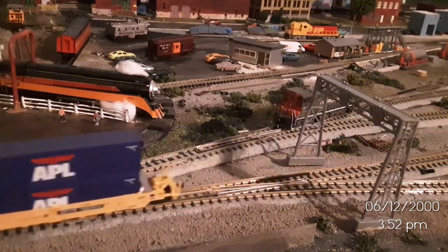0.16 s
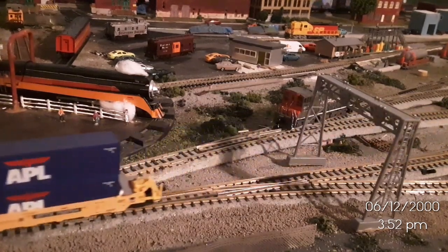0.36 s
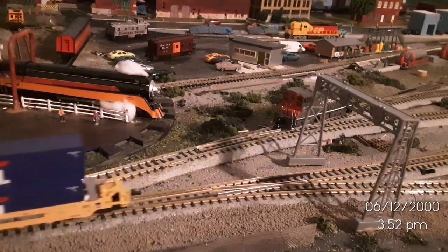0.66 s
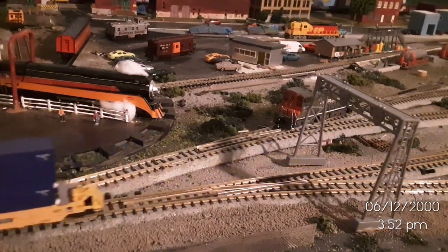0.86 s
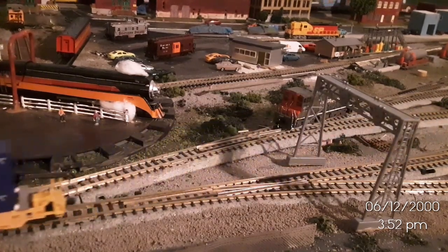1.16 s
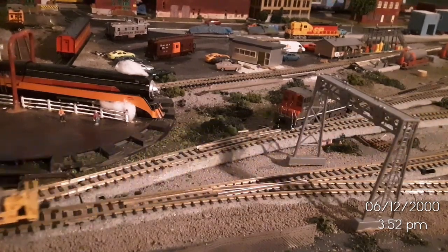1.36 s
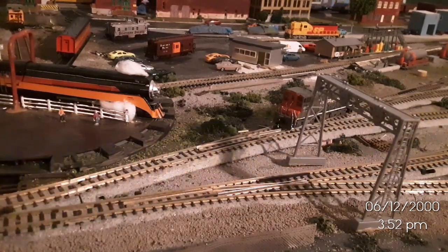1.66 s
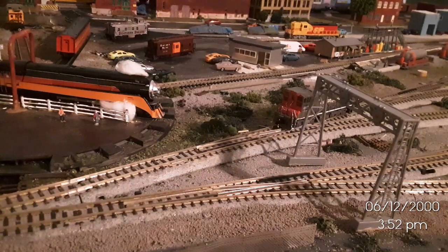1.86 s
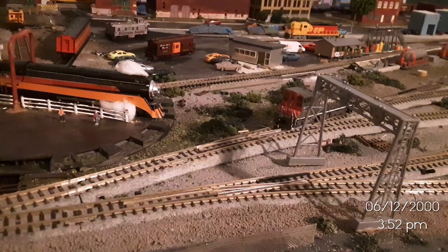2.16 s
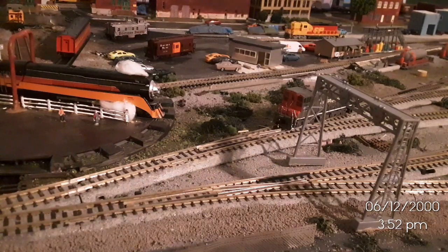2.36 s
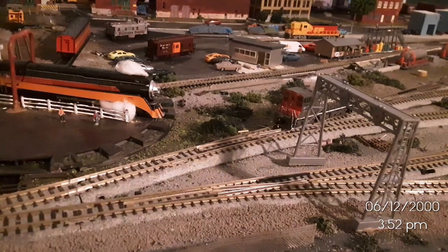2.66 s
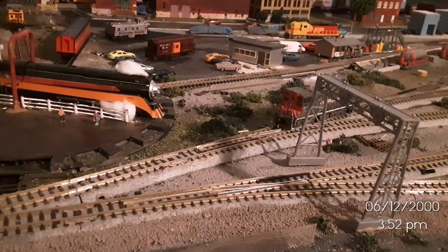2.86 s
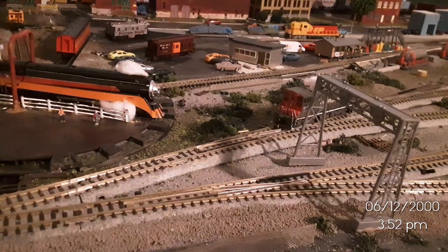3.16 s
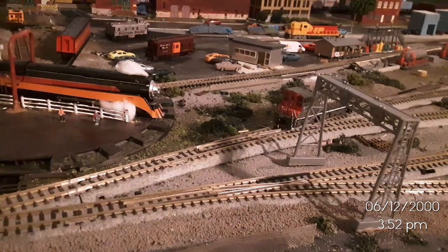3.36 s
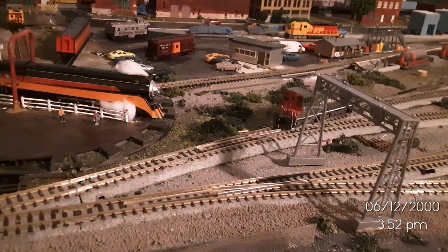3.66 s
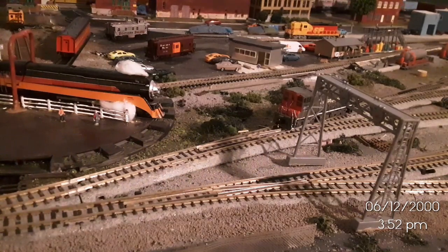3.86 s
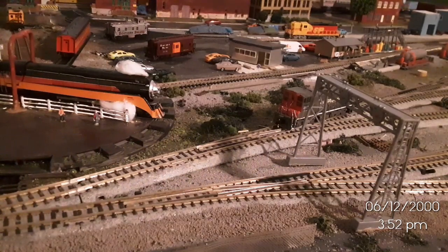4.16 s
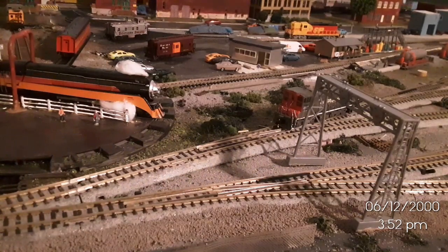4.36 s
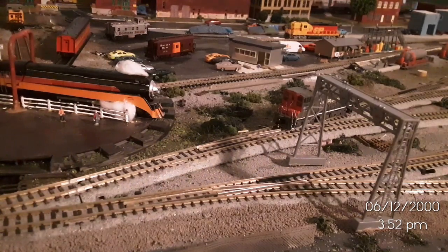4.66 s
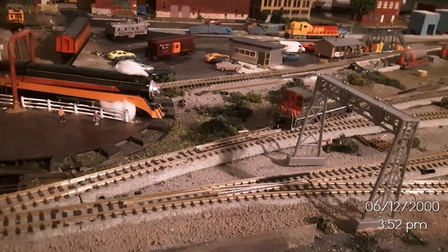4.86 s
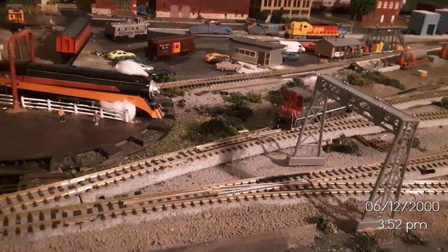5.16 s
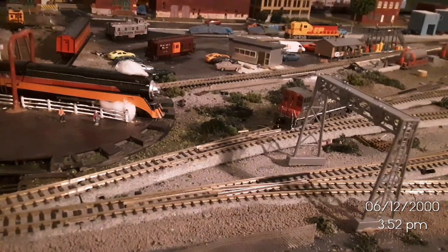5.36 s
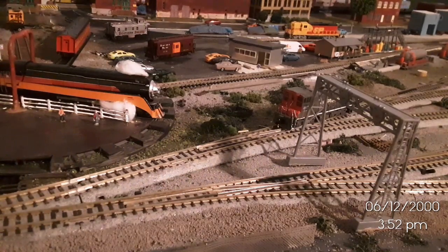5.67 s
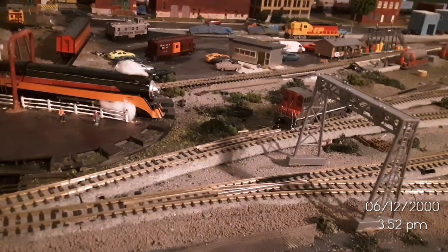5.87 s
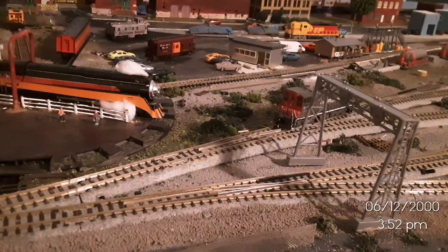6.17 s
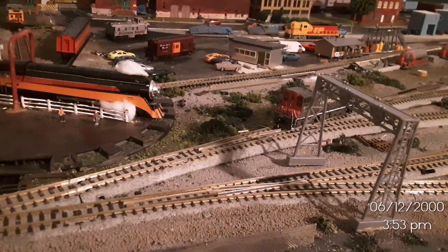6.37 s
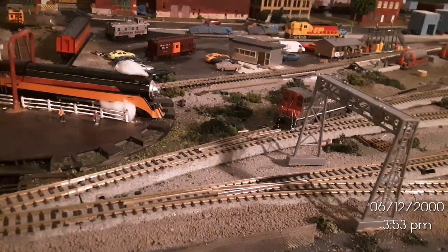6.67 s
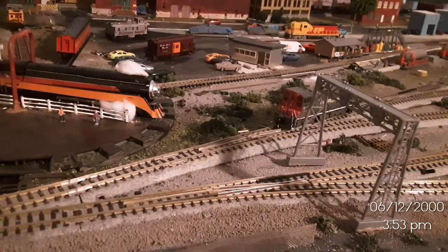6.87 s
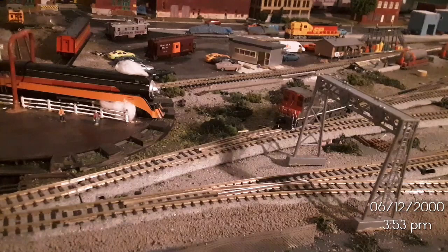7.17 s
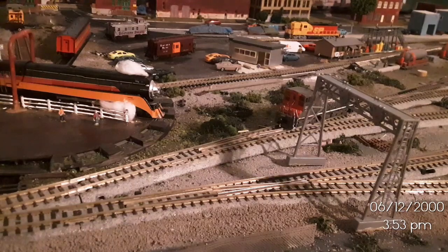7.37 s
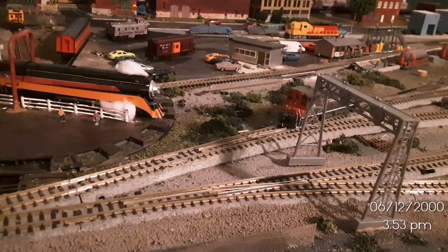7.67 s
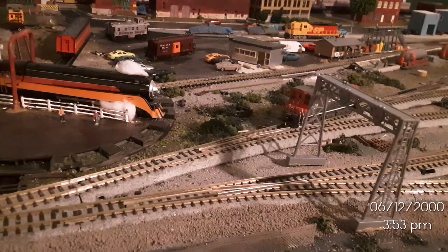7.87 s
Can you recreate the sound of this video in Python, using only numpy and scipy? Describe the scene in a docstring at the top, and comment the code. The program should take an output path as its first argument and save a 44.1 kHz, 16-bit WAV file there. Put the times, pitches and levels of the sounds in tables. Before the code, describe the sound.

A model freight train runs quietly in a small, lightly reverberant room, heard in stereo. Throughout, small wheels give a faint grainy hiss with metallic ringing, swelling a little after 0.7 seconds, over steady background hiss. Dry, tiny ticks at rail joints come irregularly, several a second, mostly left of centre; a stronger one falls at 1.1. Beneath, the wooden baseboard drones low and unevenly around 200 Hz, with thin wavering gear tones and a very high, faint motor whine. Soft coupler jolts clatter around 1.35, 1.65 and 2.0, then with a hollow bump at 5.2 to 5.3. At 5.96 a light snap, immediately followed by a much louder hard one at 5.98, then a brief bright metallic rattle at 6.08, ringing for a fraction of a second. Everything sounds ducked until just after 7 seconds, then the faint rolling and ticking recover and continue to the end at 8.

```python
"""Model freight train in a small room

Wheels hiss on the rails (shaped noise) and tick over joints (noise bursts), wagons jolt on their couplers,
the baseboard drones in its resonances, and the motor and gears whine faintly as wavering sines. Near the
microphone something, probably a track switch, snaps twice and rattles: noise bursts and decaying sines.
A gain control then ducks everything for about a second and recovers."""
import sys
import numpy as np
from scipy import signal
from scipy.fft import rfft, irfft, next_fast_len
from scipy.io import wavfile
from scipy.ndimage import uniform_filter1d, map_coordinates

SR = 44100
rng = np.random.default_rng(int(sys.argv[2]) if len(sys.argv) > 2 else 0)


def output_pcm(signal):
    """Save a mono or channel-first signal as 16-bit PCM at the path in sys.argv[1].

    Samples are clipped to [-1, 1] before scaling.
    """
    pcm = np.clip(np.atleast_2d(signal).T, -1, 1) * 32767
    wavfile.write(sys.argv[1], SR, np.round(pcm).astype(np.int16))


N = 353682
T = np.arange(N) / SR  # seconds

# How hard the wheels run on the rails. Each row: time in seconds, reference level of the wheel noise in dB.
ROLL = [(0, -66), (0.32, -65), (0.74, -59.5), (1.63, -61.5), (2.05, -57), (2.25, -61), (2.62, -58.5),
        (2.9, -61), (4.0, -60), (4.8, -62), (5.8, -59), (7.35, -61.5), (8.02, -60.5)]
# Resonances of the trucks. Each row: frequency in Hz, half-power width in Hz, relative level in dB.
TRUCK_MODES = [(2010, 130, 7), (2550, 270, -6), (3170, 370, -1.5), (4150, 270, 2), (5600, 770, -12)]


def amp(db):
    """Amplitude ratio of a level: 20 dB for each factor of ten."""
    return 10 ** (np.asarray(db) / 20)


def unit(x):
    """Normalization to equal mean power: rms 1."""
    return x / np.sqrt(np.mean(x ** 2) + 1e-20)


def along(points, hz):
    """Interpolation of (Hz, value) points on a logarithmic frequency axis, as pitch is heard."""
    f, v = np.transpose(points)
    return np.interp(np.log(hz + 1), np.log(f + 1), v)


def curves(rows):
    """Linear interpolation in time: one value per sample for each column after the time."""
    s, *cols = np.transpose(rows)
    return [np.interp(T, s, c) for c in cols]


def wobble(rate):
    """Slow random modulation: a smooth curve through random knots, `rate` of them a second."""
    knots = rng.standard_normal(int(N * rate / SR) + 4)
    grid = np.arange(0, len(knots) - 1, 1 / 10)
    return np.interp(T * rate, grid, map_coordinates(knots, [grid]))


def filtered(x, response):
    """Linear filtering: the spectrum of x times a response of frequency."""
    m = next_fast_len(N + SR // 2)
    return irfft(rfft(x, m) * response(np.fft.rfftfreq(m, 1 / SR)), m)[..., :N]


def colour(points):
    """Spectral envelope: the response through (Hz, dB) points."""
    return lambda hz: amp(along(points, hz))


def resonances(modes):
    """Modal response of a body: the powers of its (Hz, width Hz, dB) resonances add."""
    def response(f):
        power = 0
        for hz, width, db in modes:
            detuning = (f * f - hz * hz) / (f * width + 1e-9)
            power = power + amp(db) ** 2 / (1 + detuning ** 2)
        return np.sqrt(power)
    return response


def pan(lean_db):
    """Interchannel level difference: left and right gains for left minus right in dB."""
    return amp(np.array([lean_db, -lean_db]).reshape(2, -1) / 2)


def noise(response):
    """Incoherent coloured noise of rms 1: the two channels are unrelated."""
    return unit(filtered(rng.standard_normal((2, N)), response))


def train_noise(response):
    """Partially coherent noise of rms 1 from the train's side: alike in the bass, diffuse above."""
    # Coherence of the channels. Each row: frequency in Hz, correlation of left with right (no unit).
    alike_points = [(60, 0.6), (130, 0.8), (290, 0.87), (640, 0.25), (1400, 0), (15000, 0)]
    # Stereo balance of the train. Each row: frequency in Hz, left minus right level in dB.
    lean_points = [(100, 1.5), (280, 2.5), (600, 5.5), (1200, 1), (2000, 3), (2600, 7), (3500, 3),
                   (4500, 1), (6500, -4.5), (8300, 9), (11000, -1)]
    turn = lambda hz: np.arccos(np.clip(along(alike_points, hz), -1, 1)) / 2
    mid_side_gain = lambda hz: np.array([np.cos(turn(hz)), np.sin(turn(hz))])
    mid, side = noise(lambda hz: response(hz) * mid_side_gain(hz))
    left_right = np.array([mid + side, mid - side])
    return unit(filtered(left_right, lambda hz: pan(along(lean_points, hz))))


def blow(s, t60, attack):
    """Impact envelope at time s: a brief rise, then exponential decay by 60 dB in t60 seconds."""
    t = np.arange(SR // 2) / SR
    shape = amp(-60 * t / t60) * (1 - np.exp(-t / attack))
    return np.pad(shape, (round(s * SR), N))[:N]


def room(x, wet_db):
    """Reverberation: x plus its convolution with decaying noise whose treble dies first."""
    # Decay of the room. Each row: frequency in Hz, time to fall by 60 dB in seconds.
    decay_points = [(200, 0.56), (1000, 0.34), (3000, 0.31), (7000, 0.26), (14000, 0.22)]
    hz, t, z = signal.stft(rng.standard_normal((2, SR // 2)), SR, nperseg=256)
    decay = amp(-60 * t / along(decay_points, hz)[:, None])
    onset = 1 - np.exp(-t / 0.0009)
    tail = signal.istft(z * decay * onset, SR, nperseg=256)[1]
    reverb = signal.fftconvolve(x, tail / np.linalg.norm(tail[0]), axes=1)[:, :N]
    return x + amp(wet_db) * reverb


def hiss():
    """Stationary broadband noise: a faint steady hiss, unrelated in the two channels."""
    # Spectrum of the hiss. Each row: frequency in Hz, relative spectral density in dB.
    hiss_points = [(100, 0), (1000, -2), (6500, -1.5), (8500, -6.5), (12000, -8), (16000, -2.5)]
    return amp(-70) * noise(colour(hiss_points))


def baseboard():
    """Forced vibration of a panel: the board drones in its low modes over a dull, slowly sinking rumble."""
    # Modes of the board, fed more or less as the train moves on. Each row: frequency in Hz, width in Hz
    # before the response is squared, relative level at the start in dB, change of level in dB per second.
    board_modes = [(185, 17, 3, -1.55), (207.8, 16.6, 0, 0.5), (250, 60, -11.5, 0), (280.5, 16, -4, -0.83)]
    # Strength of the drone. Each row: time in seconds, reference level in dB.
    drone_levels = [(0.0, -75.5), (0.86, -64.0), (1.44, -61.5), (1.63, -69.5), (2.09, -61.0), (2.33, -71.5),
                    (2.54, -62.5), (2.93, -63.5), (3.22, -55), (4.24, -74), (4.54, -65.5), (4.98, -70),
                    (5.54, -58.5), (5.61, -63.5), (6.31, -56), (6.5, -70.5), (6.79, -55), (7.03, -74.5),
                    (7.2, -60.0), (8.02, -62.5)]
    # Spectrum of the rumble. Each row: frequency in Hz, relative spectral density in dB.
    rumble_points = [(12, -48), (20, -30.5), (81, -3), (123, -1), (150, -3.5), (170, -1.5), (220, -29),
                     (370, -120)]
    rumble_db, rumble_fade_db_per_s, rumble_sway_db = -70, 0.27, 1.6
    lump_db, lumps_per_s = 1.7, 9  # uneven track makes the drone come in lumps

    drone_db, = curves(drone_levels)
    drone = 0
    for hz, width, db, db_per_s in board_modes:
        one_mode = resonances([(hz, width, 0)])
        drone = drone + amp(db + db_per_s * T) * train_noise(lambda f: one_mode(f) ** 2)
    # Dividing by the short-time level leaves the strength to the drone curve and the lumps
    swell = np.sqrt(np.abs(uniform_filter1d(np.mean(drone ** 2, axis=0), size=7000)))
    drone_gain = amp(drone_db - 1.5 + lump_db * wobble(lumps_per_s))
    rumble_gain = amp(rumble_db - rumble_fade_db_per_s * T + rumble_sway_db * wobble(6))
    return drone_gain * drone / swell + rumble_gain * train_noise(colour(rumble_points))


def motor():
    """Rotational tones follow shaft speed: a whine that grows as load slows the motor, and gear tones."""
    # The motor slows under load and picks up again. Each row: time in seconds, whine frequency in Hz.
    motor_pitch = [(0, 13760), (0.7, 13690), (1.0, 13330), (3.2, 13280), (4.9, 13430), (5.5, 13710),
                   (8.02, 13700)]
    # Tones of the gear train. Each row: frequency at the median speed in Hz, level before its wavering
    # in dB relative to the wheel reference level, left minus right in dB.
    gear_tones = [(571, -25.5, 0), (1160, -20.5, -4.5), (1353, -20, -10), (1770, -16.5, 7.5),
                  (1870, -26, -3)]
    whine_base_db = -28  # relative to the wheel reference level, at the mean whine frequency
    whine_db_per_hz = 0.0116  # louder for each Hz that the motor drops

    roll_db, = curves(ROLL)
    whine_hz, = curves(motor_pitch)
    median_hz = np.median(whine_hz)
    speed = whine_hz / median_hz * (1 + 0.003 * wobble(5))

    def tone(hz, flutter):
        """Frequency modulation: a sine whose phase sums its wavering frequency."""
        return np.sin(2 * np.pi * np.cumsum(hz * speed * (1 + flutter * wobble(150))) / SR)

    whine_db = whine_base_db + whine_db_per_hz * (np.mean(whine_hz) - whine_hz) + 1.5 * wobble(3)
    whine = amp(whine_db + 2.5 * wobble(12)) * tone(median_hz, flutter=0.009) * pan(-5)
    gears = 0
    for hz, db, lean_db in gear_tones:
        gears = gears + amp(db + 3.3 * wobble(5.2)) * tone(hz, flutter=0.0084) * pan(lean_db)
    return amp(roll_db) * (whine + gears)


def jolts():
    """Impact excitation: coupler slack clatters and shakes the trucks; short rough tones ring besides."""
    # Wagons jolting on their couplers. Each row: start in seconds, reference level in dB,
    # time to fall by 60 dB in seconds, spectral tilt in dB per octave.
    jolt_rows = [(1.335, -56, 0.33, 2), (1.360, -46, 0.38, -0.5), (1.637, -50.5, 0.51, 1),
                 (1.991, -53.5, 0.52, 1), (5.135, -52.5, 0.22, 1.5), (5.187, -49.5, 0.19, -2),
                 (5.30, -57, 0.5, -8)]
    # Spectrum of a jolt before the tilt. Each row: frequency in Hz, relative level in dB.
    jolt_points = [(150, -33), (400, 6), (700, -2), (1100, 5.5), (2000, 0.5), (4500, -1.5), (6500, -1.5),
                   (8500, -19), (16000, -20)]
    # Hollow bumps in the benchwork, and last a short ring near 1.2 kHz after the switch rattle.
    # Each row: start in seconds, reference level in dB, frequency in Hz, time to fall by 60 dB in seconds.
    short_tones = [(5.192, -58, 470, 0.35), (5.198, -51.5, 586, 0.18), (5.222, -58, 994, .12),
                   (5.303, -52, 454, 0.09), (5.344, -49, 440, 0.19), (6.228, -41.5, 1173, 0.054)]

    def tilted(tilt_db):
        """Spectral tilt about 1 kHz, level below 300 Hz."""
        return lambda hz: amp(along(jolt_points, hz) + tilt_db * np.log2(np.maximum(hz, 300) / 1000))

    trucks = amp(-5.0) * noise(resonances(TRUCK_MODES))
    clatter = 0
    for s, db, t60, tilt_db in jolt_rows:
        clatter = clatter + amp(db - 0.5) * blow(s, t60, attack=0.0025) * (noise(tilted(tilt_db)) + trucks)
    tones = 0
    for s, db, hz, t60 in short_tones:
        rough_tone = np.sin(2 * np.pi * hz * T + 0.73 * wobble(120)) * amp(2.8 * wobble(83))
        tones = tones + amp(db) * blow(s, t60, attack=0.0045) * rough_tone
    return clatter * pan(0.82) + room(tones * pan(2.5), wet_db=-11)


def rattle_envelope(start):
    """Repeated contact until rest: attack, hold, sag and release as the switch's armature rattles home."""
    level_db, attack_s, hold_s = -14.5, 0.0005, 0.023
    sag_s, full_sag_db = 0.025, 6.5
    t60 = 0.055  # seconds, once the armature is home
    t = np.maximum(T - start, 0)
    sag_db = full_sag_db * np.clip((t - hold_s) / sag_s, 0, 1)
    release_db = 60 * np.maximum(t - hold_s - sag_s, 0) / t60
    return amp(level_db - sag_db - release_db) * (1 - np.exp(-t / attack_s))


def switch():
    """Impacts and free vibration: a light and a hard snap, then metal contacts that ring the casing."""
    # Blows within the two snaps. Each row: start in seconds, reference level in dB,
    # time to fall by 60 dB in seconds.
    snap_rows = [(5.9549, -28, 0.031), (5.958, -23.5, 0.019), (5.9652, -29, 0.073), (5.9816, -16, 0.044),
                 (5.983, -7, 0.0086), (5.9867, -23.5, 0.059)]
    # Spectrum of the snaps. Each row: frequency in Hz, relative spectral density in dB.
    snap_points = [(100, -32.5), (250, -28), (400, -31), (550, -20.5), (1000, -12.5), (1300, -11.5),
                   (1750, -5.5), (2700, -14), (4300, -6.5), (5200, -8.5), (6400, 1.5), (7800, -18),
                   (12500, -13.5), (16000, -18)]
    # Spectrum of the rattle. Each row: frequency in Hz, relative spectral density in dB.
    rattle_points = [(80, -28), (200, -24), (330, -19.5), (480, -12), (680, -17), (900, -13), (1350, -4),
                     (2000, -6.5), (2500, -8.5), (3100, -3.5), (3700, -7), (5500, -1.5), (6700, 1),
                     (7700, -13.5), (10500, -9), (16000, -10.5)]
    # Modes of the casing. Each row: frequency in Hz, reference level in dB, time to fall by 60 dB in seconds.
    casing_modes = [(441, -22.5, 0.13), (1340, -27, 0.11), (1675, -22.5, 0.153), (2950, -24.5, 0.21),
                    (6340, -17, 0.14), (6500, -26, 0.11), (7290, -28, .13)]
    # Stereo balance of the switch. Each row: frequency in Hz, left minus right level in dB.
    switch_lean = [(400, 1), (1200, 0), (2200, 3), (4500, 0), (6400, -5), (8000, 1.5), (13000, -0.5)]
    rattle_s = 6.0833  # start of the rattle

    snap_force = sum(amp(db) * blow(s, t60, attack=0.00037) for s, db, t60 in snap_rows)
    snaps = snap_force * noise(colour(snap_points))
    contacts = unit(amp(1.5 * wobble(900)))
    rattle = rattle_envelope(rattle_s) * contacts * noise(colour(rattle_points))
    ring = 0
    for hz, db, t60 in casing_modes:
        phase = 0.5 * wobble(60) + rng.normal(0, 0.37, (2, 1))  # radians, offset in each channel
        ring = ring + amp(db) * blow(rattle_s, t60, attack=0.016) * np.sin(2 * np.pi * hz * T + phase)
    sound = room(snaps, wet_db=-7) + room(rattle, wet_db=-7.0) + ring
    return filtered(sound, lambda hz: pan(along(switch_lean, hz)))


def faint_ticks(usual_edge_db):
    """Random point process: small ticks at chance moments, as (s, dB, edge dB) rows."""
    ticks_per_s, level_db, spread_db = 3.5, -48.5, 0.5
    rows = []
    for when, size in rng.random((round(ticks_per_s * N / SR), 2)):
        rows.append((when * T[-1], level_db + spread_db * (2 * size - 1), usual_edge_db))
    return rows


def ticks():
    """Impact at rail joints: a short crack, brighter when hard; trucks ring more as the train runs louder."""
    # The clearest wheel clicks. Each row: start in seconds, reference level in dB,
    # relative level of the hard edge in dB.
    clear_ticks = [(0.08, -40, -11), (0.2837, -37.5, -13.5), (0.3176, -38, -16), (0.3244, -43, -24),
                   (0.5564, -41, -22), (0.8611, -42.5, -28), (1.1435, -31.5, -20), (1.344, -40, -25),
                   (1.637, -43, -18), (1.8663, -41, -29), (2.1208, -39.5, -13), (2.1885, -39.5, -25),
                   (2.414, -41, -28), (2.9911, -37.5, -31), (3.198, -42, -30), (3.272, -39, -15),
                   (3.7183, -42.5, -29), (3.9306, -37.5, -17), (4.0604, -38.5, -26), (4.285, -39.5, -24),
                   (4.352, -42, -34), (4.565, -38.5, -22), (5.1891, -45, -29), (5.3333, -43, -32),
                   (5.5418, -41.5, -27), (5.8516, -40.5, -18), (7.439, -40, -34), (7.638, -38, -27),
                   (7.9311, -41, -29)]
    # Spectrum of the crack. Each row: frequency in Hz, relative level in dB.
    crack_points = [(300, -28), (1500, -14), (2100, 1.5), (3200, 4), (4300, 1.5), (6800, 1.5),
                    (8300, -31.5), (11000, -24), (16000, -32)]
    # Spectrum of the hard edge. Each row: frequency in Hz, relative level in dB.
    edge_points = [(2000, -36), (5000, -6), (6800, 7.5), (8000, -3.5), (11000, -10.5), (16000, -9)]
    usual_edge_db = -24.5  # edge of an ordinary click, on the scale of the rows
    lean_db, lean_spread_db = 5, 1.5  # left minus right, and its scatter from click to click
    # The truck's ring under a click: dB, dB more per dB of wheel noise, dB more per dB less edge
    ring_db, ring_grows, ring_soft = -12, 1.8, 0.3

    roll_db, = curves(ROLL)
    crack, edge, ring = np.zeros((3, 2, N))
    for s, db, edge_db in clear_ticks + faint_ticks(usual_edge_db):
        force = amp(db - 2.5) * pan(lean_db + lean_spread_db * rng.standard_normal())
        crack += force * blow(s + 0.00022, t60=0.011, attack=0.00043)
        edge += force * amp(edge_db + 12.5) * blow(s + 0.0004, t60=0.0084, attack=0.0004)
        ring += force * amp(ring_soft * (usual_edge_db - edge_db)) * blow(s, t60=0.073, attack=0.001)
    # Growth with the wheel noise stops 1 dB above its median
    ring *= amp(ring_db + ring_grows * np.minimum(roll_db - np.median(roll_db), 1))
    strikes = crack * noise(colour(crack_points))
    strikes += edge * noise(colour(edge_points))
    strikes += ring * noise(resonances(TRUCK_MODES))
    return room(strikes, wet_db=-5.5)


def rolling():
    """Roughness excitation: uneven rails make the wheels hiss grainily and keep the wagon bodies ringing."""
    # Spectrum of the wheels. Each row: frequency in Hz, relative spectral density in dB.
    wheel_points = [(180, -14), (300, -5), (393, -9.5), (565, -8), (929, -5), (1160, -2), (1570, -4),
                    (1830, -0.5), (2330, -4), (2670, -4.5), (5260, -5.5), (6390, -3), (9180, -32),
                    (11000, -26), (14300, -41), (22000, -120)]
    # Finest scraping of the wheels. Each row: frequency in Hz, relative spectral density in dB.
    fizz_points = [(5000, -32), (8000, 0.5), (10500, -5), (13000, 2.5), (16000, -3.5)]
    # Ringing of the wagons. Each row: frequency in Hz, half-power width in Hz, relative level in dB.
    wagon_modes = [(545, 17, -15), (679, 13, -2), (1110, 50, -7.5), (1340, 14, 3), (1842, 21, 5.5),
                   (1936, 110, 1), (2060, 88, -5), (6540, 220, -3.5)]
    roll_db, = curves(ROLL)
    grain = unit(amp(1.19 * wobble(25) + 1.43 * wobble(400)))
    wheels = grain * (amp(2) * train_noise(colour(wheel_points)) + amp(-15) * noise(colour(fizz_points)))
    wagons = amp(-7.5 + 1.8 * wobble(8)) * train_noise(resonances(wagon_modes))
    return amp(roll_db) * (wheels + wagons)


def scene():
    """Superposition: the pressures of hiss, train and switch add."""
    return hiss() + baseboard() + motor() + jolts() + switch() + ticks() + rolling()


def gain_control(x, ceiling_db, hold, release):
    """Level limiting: the gain drops at once for a loud sound, stays down and then climbs back."""
    power = np.abs(uniform_filter1d(np.mean(x ** 2, axis=0), size=220))
    step = 64  # samples between gain values
    needed_db = np.minimum(ceiling_db - 10 * np.log10(power[::step] + 1e-12), 0)

    def past(v, n):
        """Sliding memory: each value with the n before it."""
        return np.lib.stride_tricks.sliding_window_view(np.pad(v, (n, 0)), n + 1)

    held_db = past(needed_db, int(hold * SR / step)).min(axis=1)
    eased_db = past(held_db, int(release * SR / step)).mean(axis=1)
    return x * amp(np.interp(T, T[::step], np.minimum(held_db, eased_db)))


def record(dry):
    """Limiting of level, then of bandwidth: gain control and a sharp upper cutoff."""
    top_hz = 15850
    levelled = gain_control(dry, ceiling_db=-19, hold=0.97, release=0.25)  # hold and release in seconds
    return filtered(levelled, lambda hz: hz < top_hz)


dry = scene()
out = record(dry)
output_pcm(out)
```